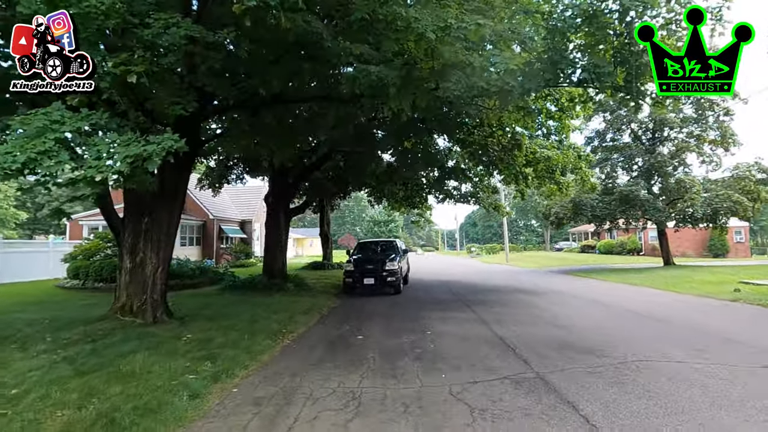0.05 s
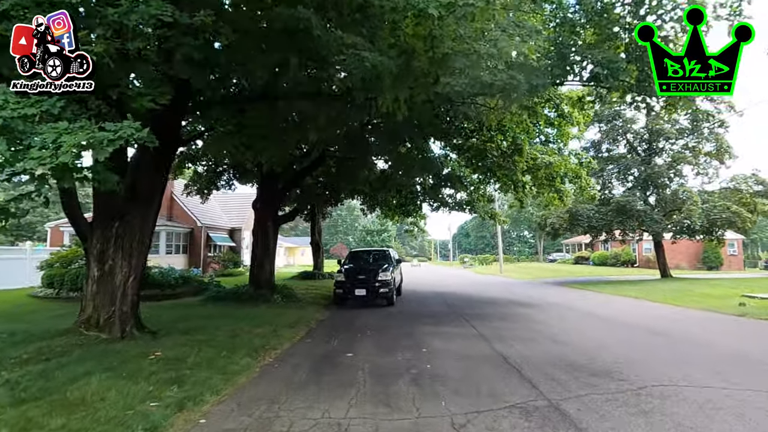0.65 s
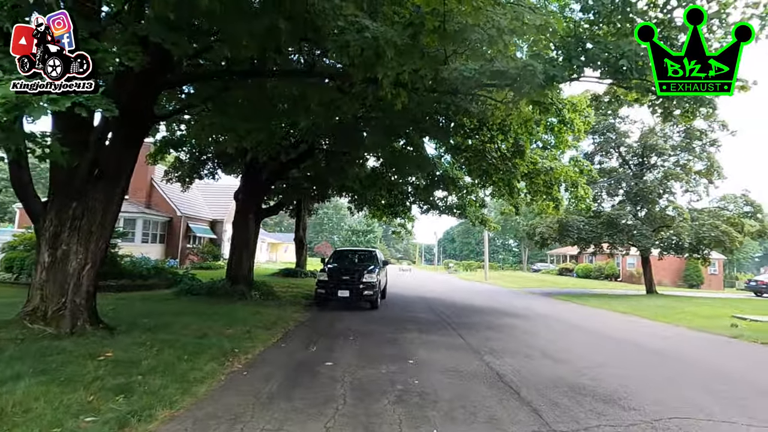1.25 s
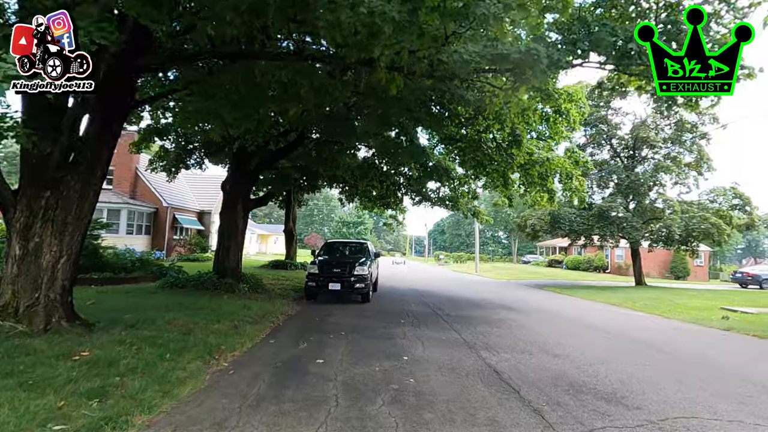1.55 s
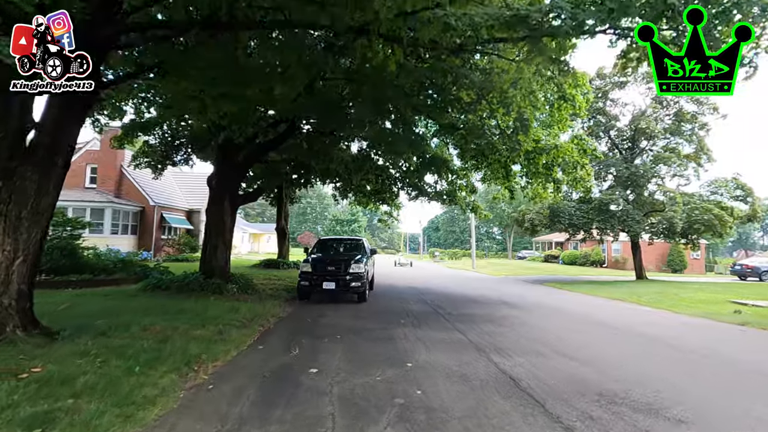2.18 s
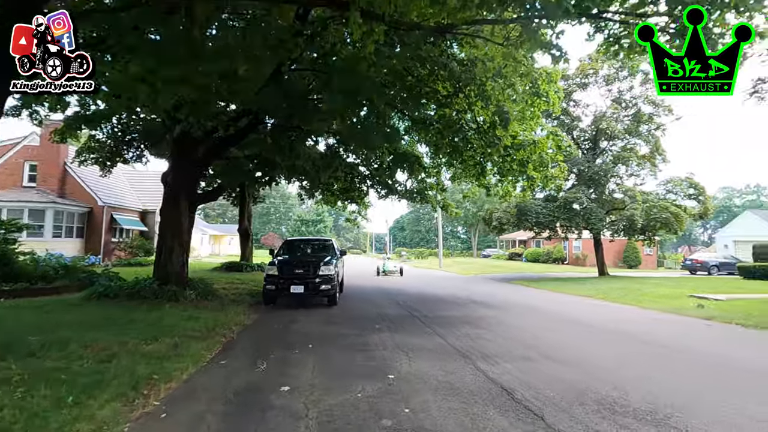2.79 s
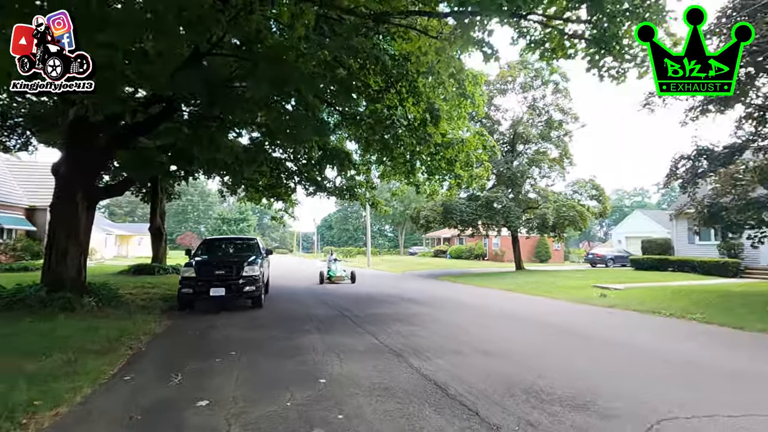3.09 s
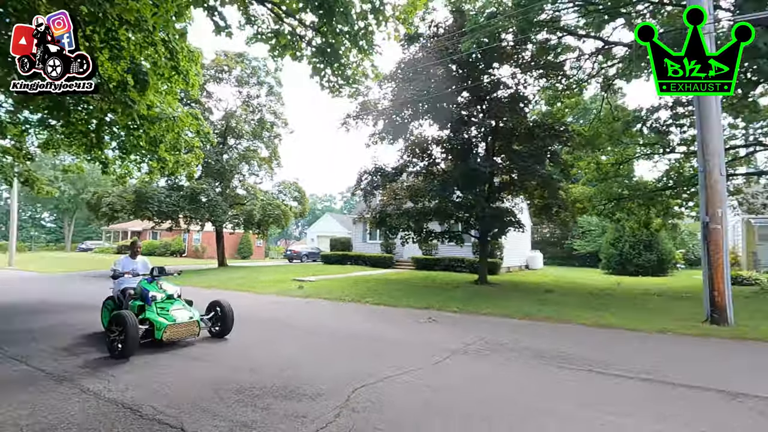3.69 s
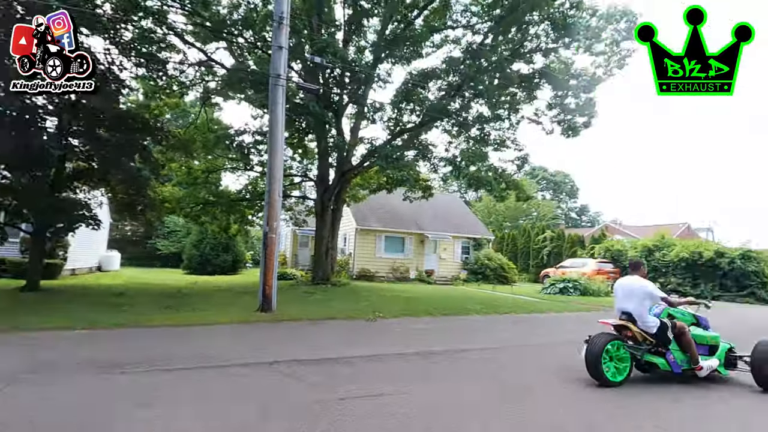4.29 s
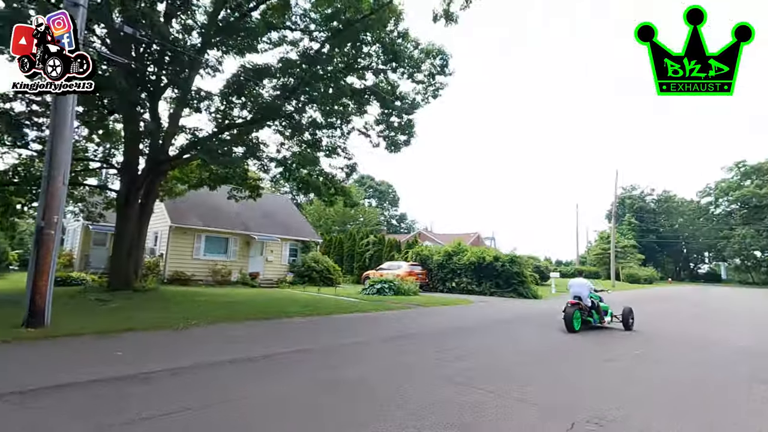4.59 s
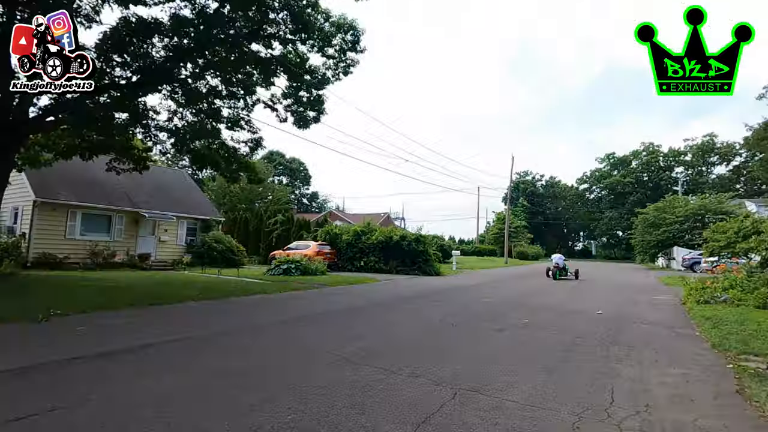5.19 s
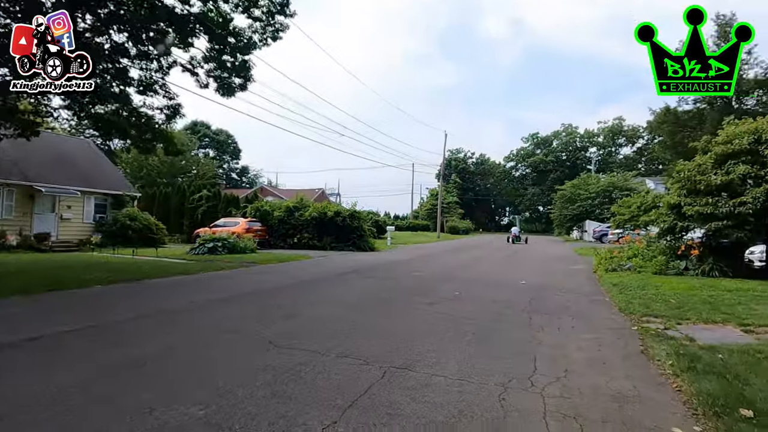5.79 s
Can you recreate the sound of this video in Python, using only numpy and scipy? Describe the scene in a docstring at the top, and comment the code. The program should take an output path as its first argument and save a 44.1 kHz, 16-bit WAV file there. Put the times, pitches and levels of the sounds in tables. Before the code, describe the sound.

Outdoors, wind buffets the microphone with low thumps while a motor trike's raspy exhaust drone grows from the distance, over faint leaves, insects and a few bird chips. The engine is loudest as it sweeps by about two thirds of the way through, its note falling. It then recedes down the street, easing off into an uneven burble with several dull pops.

```python
"""An open exhaust drones closer: a three-cylinder trike passes at about 4 s and shuts the throttle at 5 s.
The pipe sounds the firing harmonics, gas and tyres hiss, and on the overrun it burbles and spits.
Wind buffets the microphone and pushes a limiter.
In the trees along the street, leaves rustle, insects shrill and a small bird chips."""
import sys
import numpy as np
from scipy import signal
from scipy.fft import rfft, irfft, next_fast_len
from scipy.io import wavfile
from scipy.ndimage import uniform_filter1d, minimum_filter1d

SR = 44100
rng = np.random.default_rng(int(sys.argv[2]) if len(sys.argv) > 2 else 0)


def file_out(sig):
    """Save sig as 16-bit WAV at sys.argv[1]."""
    # one column per channel
    cols = np.atleast_2d(sig).T
    # limit, then scale
    lim = np.clip(cols, -1, 1)
    pcm = np.round(lim * 32767).astype(np.int16)
    wavfile.write(sys.argv[1], SR, pcm)


N = 257971
T = np.arange(N) / SR
PASS_S, SPEED_M_S, CLOSEST_M = 4.12, 18, 3.0
FAR_M, FRONT_M = 72, 33  # pipe timbre: far beyond FAR_M, frontal within FRONT_M
SHUT_S, OVERRUN_S = 5.0, 0.39  # throttle shuts; time to sink into overrun
THUD, BODY, DRONE, BARK, ROAR, HISS = range(6)  # rows of ENGINE_VOICES

# Engine speed: time_s, firing_hz
ENGINE_SPEED = [(0, 132.2), (.55, 125.8), (.92, 121.9), (1.5, 122), (1.7, 123.5), (3.4, 123.1),
                (4.4, 122.9), (4.97, 122.2), (5.12, 117.4), (5.3, 114.1), (5.45, 109), (5.85, 108)]
def crank():
    """Doppler-shifted count of four-stroke cycles; even under load, hunting on the overrun."""
    _, bearing = road()
    heard_hz = curve(ENGINE_SPEED) / (1 + bearing * SPEED_M_S / 343)
    hunting = np.interp(T - SHUT_S, [.15, .4], [.0012, .011])
    return np.cumsum(heard_hz * (1 + hunting * walk(90))) / SR / 3


# Silencer booms at the firing rate: centre_s, half_length_s, level_db
BOOMS = [(5.0, 0.029, -14), (5.28, 0.1, -16), (5.53, .1, -14.5)]
# Brief fades of one firing harmonic: harmonic, centre_s, half_length_s, change_db
FADES = [(2, 1.004, 0.056, -11.5), (2, 1.8, .1, -10), (1, 2.52, 0.48, -6)]
# Low pipe harmonics, relative levels: cycle_multiple, far_db, front_db, behind_db
LUMP_HARMONICS = [(4, -39, -36, -23), (5, -32, -36, -30), (7, -30, -33, -27), (8, -14, -18, -24.5),
                  (10, -15, -16, -19), (11, -31.5, -46.5, -43.5), (12, -14, -28.5, -25)]
# Upper pipe harmonics, relative levels: cycle_multiple, far_db, front_db, behind_db
BARK_HARMONICS = [(13, -5, -14, -22.5), (14, -8.5, -3.5, -16.5), (15, 6.5, 2.5, 3), (16, -5.5, 0, -8),
                  (17, 1.5, -1, -16), (18, 1, 2, 3), (19, -17, -27, -17.5), (20, -18.5, -20.5, -25),
                  (21, 6, -4.5, -24.5), (22, -3.5, -22.5, -24), (23, -7, -8.5, -21.5), (24, -6, -11, -4),
                  (25, -18, -10.5, -13), (27, -8, -21, -9), (30, -16, -17.5, -18)]
def drone(cycle, view, flutter_db=1.5, stumble_db=3.5, jitter_rad=.035, closing_s=0.027):
    """Three strong firing harmonics, the lump of unequal cylinders, and a bark on open throttle."""
    thud_db, body_db, drone_db, bark_db = map(level_db, (THUD, BODY, DRONE, BARK))
    # combustion grows uneven on the overrun
    uneven_db = flutter_db + (stumble_db - flutter_db) * shut(OVERRUN_S)
    gains = [np.hypot(undb(thud_db), humps(BOOMS)), undb(body_db), undb(drone_db)]
    firing = 0
    for k, gain in enumerate(gains, 1):
        fade_db = sum(db * hump(s, half_s) for harmonic, s, half_s, db in FADES if harmonic == k)
        angle = 6 * np.pi * k * cycle + jitter_rad * walk(30)
        firing -= np.sqrt(2) * gain * undb(fade_db + uneven_db * walk(26)) * np.cos(angle)
    lump = harmonics(cycle, view, LUMP_HARMONICS, scatter=0.22) * undb(drone_db - 2)
    # the open end beams its upper harmonics backwards
    beam_db = np.interp(view, [0, 1, 2], [-.5, -.7, 2.5])
    bark = unit(harmonics(cycle, view, BARK_HARMONICS, scatter=0.27))
    return firing + lump + bark * undb(bark_db + beam_db - 9 * shut(closing_s))


def harmonics(cycle, view, rows, scatter, direct_db=5, direct_m=19):
    """Pipe harmonics waver with reflections; close by, direct sound lifts the firing multiples."""
    distance, _ = road()
    closeness = 1 / (1 + (distance / direct_m) ** 2)
    wavering = scatter * (1 - closeness / 2)
    out = 0
    for k, *db in rows:
        on_firing = round(k) % 3 == 0
        angle = 2 * np.pi * (round(k) * cycle + rng.random()) + wavering * walk(16)
        gain = np.interp(view, [0, 1, 2], undb(db)) * undb(direct_db * closeness * on_firing)
        out += np.sqrt(2) * gain * (1 + wavering * walk(18)) * np.sin(angle)
    return out


# Gas roar spectrum: freq_hz, relative_db
ROAR_SPECTRUM = [(450, -1.5), (700, -1), (1050, -5), (1500, -7), (2000, -13.5), (3500, -25)]
# Gas and tyre hiss spectrum: freq_hz, relative_db
HISS_SPECTRUM = [(1180, -11.5), (2000, -5.5), (3090, -3.5), (4280, -9.5), (5730, -10.5), (6980, -16.5),
                 (8790, -15.5), (9660, -19.5), (10700, -30.5), (13700, -25), (15500, -34)]
def rush(cycle, pulsing=0.18, sharpness=0.74):
    """Gas leaves in a puff at each firing, one cylinder stronger; tyre noise fills the gaps."""
    roar_db, hiss_db, drone_db = map(level_db, (ROAR, HISS, DRONE))
    imbalance = 1 + 0.24 * np.cos(2 * np.pi * cycle)
    puffs = unit(np.exp(sharpness * np.cos(6 * np.pi * cycle)) * imbalance)
    gate = unit(1 - pulsing + pulsing * puffs * undb(3 * walk(130)))
    turbulence = walk(16)
    roar = noise(ROAR_SPECTRUM) * undb(roar_db + 1.5 * turbulence)
    hiss = noise(HISS_SPECTRUM) * undb(hiss_db + 0.83 * turbulence)
    pipe_flow = unit(ring(ring(rng.standard_normal(N), 366, 110), 300, 260))
    return gate * (roar + hiss + pipe_flow * undb(drone_db - 18 + 0.41 * turbulence))


# Header pipe resonances: centre_hz, nominal_width_hz, relative_db
HEADER_MODES = [(1034, 390, 4), (1390, 680, -7.5), (1964, 880, -6.5), (2555, 450, -11.5), (3370, 670, -8.5)]
def rasp(cycle, near_db=-9.5, far_db=-3.5, scatter_db=5.5, decay_s=.005):
    """The sharp edge of each blow-down rings the header pipes, differently for each cylinder."""
    at = firings(cycle)
    strength = undb(scatter_db * np.minimum(rng.standard_normal(len(at)), 1))
    edges = 0
    for cylinder in range(3):
        pulses = np.zeros(N)
        pulses[at[cylinder::3]] = strength[cylinder::3]
        clatter = rng.standard_normal(1024) * np.exp(-T[:1024] / decay_s)
        edges += signal.oaconvolve(pulses, unit(clatter))[:N]
    distance, _ = road()
    offset_db = np.interp(distance, [CLOSEST_M, FRONT_M], [near_db, far_db])
    return unit(resonate(edges, HEADER_MODES)) * undb(level_db(ROAR) + offset_db)


# Silencer resonances: centre_hz, nominal_width_hz, relative_db
SILENCER_MODES = [(131, 43, -2.5), (182, 85, -2.5), (332, 123, -6), (450, 218, -13)]
def burble(cycle, scatter_db=4.0, jitter_s=0.00099, puff_s=0.013, rise_s=0.098):
    """Overrun firings come weak, strong, early and late; each thumps the silencer and puffs gas."""
    at = firings(cycle)
    timing, strength = rng.standard_normal((len(at), 2)).T
    at = np.clip(at + (jitter_s * SR * timing).astype(int), 0, N - 1)
    pulses = np.zeros(N)
    pulses[at] = undb(scatter_db * np.minimum(strength, 1.5))
    pulses = lowpass(pulses, 700)
    puffs = signal.lfilter([1], [1, -np.exp(-1 / (puff_s * SR))], pulses)
    gas = puffs * noise([(550, -2.5), (1000, -0.5), (1700, -12.5), (2450, -10), (4500, -29)])
    thumps = unit(resonate(pulses, SILENCER_MODES))
    return (thumps + unit(gas) * undb(-13)) * undb(-17.5) * shut(rise_s)


# Afterfire: start_s, level_db
SPITS = [(4.983, -19), (5.355, -22), (5.393, -23), (5.429, -22.5), (5.486, -17), (5.621, -24)]
def spits(decay_s=.008):
    """Unburnt fuel goes off in the pipe in short, dull cracks."""
    bursts = sum(undb(db) * (T > s) * np.exp(-np.abs(T - s) / decay_s) for s, db in SPITS)
    return lowpass(bursts, 900) * noise([(300, -10), (1000, 9), (1700, -6), (5000, -21)])


# How each voice carries: base_db, reach_m, loss_per_doubling_db, behind_db, swell_share, overrun_db
ENGINE_VOICES = [(-20.5, 4.04, 4, -1.5, 0.36, 11.5), (-10.5, 6.93, 7, -6.5, 0.39, -4.5),
                 (-11, 16.8, 6.5, -0.5, 0.74, -11.5), (-23.5, 14.1, 6, -0.5, 0.49, 0.5),
                 (-25.5, 9.3, 5.5, -3, 0.096, -1), (-33.5, 14.55, 11.5, -5.5, 0.36, 4.5)]
# Exhaust swell and sag, before swell_share: time_s, change_db
SWELL = [(0, -3), (.1, -7.5), (.28, -12), (.6, -0.5), (1.15, -6), (1.45, 4.5), (1.85, -2.5), (2.25, -0.5),
         (2.4, -5), (3.02, 2.5), (3.35, -3), (3.5, 1.5), (3.97, -0.5), (4.09, 1.5), (4.35, -3),
         (4.94, -2.5), (5.0, 2), (5.06, -4.5)]
def level_db(voice, carry_behind=2.76):
    """Voice level from distance, bearing and throttle; the rear-facing pipe carries farther behind."""
    base_db, reach_m, loss_db, behind_db, share, overrun_db = ENGINE_VOICES[voice]
    distance, bearing = road()
    behind = (1 + bearing) / 2
    doublings = np.log2(np.hypot(1, distance / (reach_m * carry_behind ** behind)))
    source_db = base_db + share * curve(SWELL) + overrun_db * shut(OVERRUN_S) ** 2
    return source_db - loss_db * doublings + behind_db * behind


def road():
    """Straight pass at steady speed: distance in metres, bearing from -1 coming to 1 going."""
    along = SPEED_M_S * (T - PASS_S)
    distance = np.hypot(along, CLOSEST_M)
    return distance, along / distance


def firings(cycle):
    """Samples at which a cylinder fires, three to a cycle."""
    return np.flatnonzero(np.diff(np.floor(3 * cycle)))


def shut(ramp_s):
    """Ramp from 0 to 1 once the throttle shuts."""
    return np.clip((T - SHUT_S) / ramp_s, 0, 1)


# Swells and dips: centre_s, half_length_s, change_db
WAVERS = [(0.74, 0.025, -2.5), (2.405, 0.065, -3.5), (3.084, .13, 2.5), (3.7, 0.28, 3),
          (3.965, 0.053, -4.5), (4.074, 0.028, 0)]
def waver():
    """Gain that briefly lifts or dips the rush, rasp and leaves."""
    return undb(sum(db * hump(s, half_s) for s, half_s, db in WAVERS))


# Slow pressure swings: time_s, level_db
SWAY = [(0, -7.5), (1.2, -7), (2.4, -12.5), (3.3, -7.5), (4, -14.5), (4.8, -15.5), (5.2, -10), (5.85, -6)]
# Buffeting spectrum: freq_hz, relative_db
BUFFET_SPECTRUM = [(12, 3.5), (22, 2.5), (50, -7), (80, -17.5), (130, -27), (250, -42.5), (600, -65.5)]
# Gusts: centre_s, half_length_s, level_db
GUSTS = [(.11, 0.045, -9.5), (.66, 0.052, -15), (.96, .08, -14.5), (1.4, 0.097, -9), (1.78, 0.079, -12),
         (1.96, .04, -19), (2.23, 0.066, -15), (2.53, 0.079, -17), (3.08, .05, -21), (3.68, 0.13, -19),
         (5.04, 0.064, -14), (5.39, .04, -12.5)]
# Single eddies: centre_s, half_length_s, level_db
THUMPS = [(0.647, 0.048, -9.5), (1.01, .03, -17), (1.435, 0.047, -8), (1.76, .03, -22),
          (1.96, 0.017, -13.5), (2.27, 0.032, -23), (3.088, .012, -9)]
def wind(rise_db_per_s=0.07, wander_db=5, pop_s=.1295):
    """Eddies at the microphone: slow pressure swings, buffeting gusts, thumps and one sharp pop."""
    sway = unit(np.tanh(noise([(2.5, 7.5), (5, 5), (11, -5), (19, -11.5), (30, -20.5)])))
    lull_db = -13 * hump(4.07, 0.065)
    steady = undb(-22.5 + rise_db_per_s * T + wander_db * walk(13) + lull_db)
    buffet = noise(BUFFET_SPECTRUM) * np.hypot(steady, humps(GUSTS))
    thumps = humps(THUMPS) * noise([(30, 4), (48, 4.5), (75, -9.5), (130, -30.5), (300, -50)])
    pop_edge = (1 + np.tanh((T - pop_s) / .00009)) / 2
    pop = undb(-7) * pop_edge * np.exp(-np.abs(T - pop_s) / .0015)
    return sway * undb(curve(SWAY)) + buffet + thumps + pop


# Leaf spectrum: freq_hz, relative_db
LEAF_SPECTRUM = [(1500, 2), (1970, -1), (2350, -5), (2660, 0.5), (3000, -2.5), (3900, -3.5), (5100, -9.5),
                 (7000, -14.5), (8800, -17), (9700, -22.5), (10600, -31), (15000, -36)]
# Breaths of breeze: start_s, length_s, level_db
RUSTLES = [(0.512, 0.17, -46), (0.846, 0.57, -45.5), (1.263, 0.477, -40.5), (2.05, 0.21, -47)]
def leaves(floor_db=-45, rise_s=0.038, fall_s=.035):
    """The trees rustle as the breeze comes, holds and drops."""
    breeze = 0
    for start_s, length_s, db in RUSTLES:
        rise = np.clip((T - start_s) / rise_s, 0, 1)
        fall = np.exp(-np.maximum(T - start_s - length_s, 0) / fall_s)
        breeze += undb(db) * rise * fall
    return noise(LEAF_SPECTRUM) * np.hypot(undb(floor_db), breeze) * undb(0.52 * walk(14))


# Bird chips: start_s, length_s, top_pitch_hz, level_db
CHIPS = [(0.186, 0.051, 4900, -39), (0.275, 0.034, 3850, -40), (0.537, 0.036, 4070, -47),
         (.612, 0.034, 4450, -41.5), (0.978, 0.046, 4830, -41)]
def bird(arch=0.2, echo=0.42):
    """Short arched chips with a fast warble, blurred by the foliage."""
    chips = np.zeros(N)
    warble = 1 + .026 * walk(400)
    for start_s, length_s, top_hz, db in CHIPS:
        progress = np.clip((T - start_s) / length_s, 0, 1)
        pitch_hz = top_hz * (1 - arch * (2 * progress - 1.15) ** 2) * warble
        chips += undb(db) * np.sin(np.pi * progress) * np.sin(2 * np.pi * np.cumsum(pitch_hz) / SR)
    foliage = rng.standard_normal(SR // 4) * np.exp(-T[:SR // 4] / .025)
    return chips + echo * signal.oaconvolve(chips, foliage / np.linalg.norm(foliage))[:N]


def insects(pitch_hz=2642, width_hz=110, db=-54.5):
    """A thin, steady shrill from the trees."""
    band = ring(rng.standard_normal(N), pitch_hz, width_hz)
    return undb(db) * unit(ring(band, pitch_hz, width_hz))


def undb(db):
    """Decibels to gain."""
    return 10 ** (np.asarray(db) / 20)


def unit(x):
    """Scale to rms 1."""
    return x / np.sqrt(np.mean(x ** 2))


def curve(rows):
    """Straight lines through (time_s, value) rows."""
    return np.interp(T, *np.transpose(rows))


def hump(centre_s, half_s):
    """Smooth rise to 1 and fall."""
    return np.exp(-((T - centre_s) / half_s) ** 2)


def humps(rows):
    """Summed gain of (centre_s, half_length_s, level_db) rows."""
    return sum(undb(db) * hump(s, half_s) for s, half_s, db in rows)


def walk(rate_hz):
    """Smooth random drift of spread 1, with rate_hz new values a second."""
    points = signal.resample(rng.standard_normal(4096), 8 * 4096)
    return np.interp(8 * rate_hz * T, np.arange(len(points)), points)


def noise(spectrum):
    """Noise of rms 1 shaped by (freq_hz, relative_db) rows, falling off beyond their ends."""
    hz, db = np.transpose(spectrum)
    size = next_fast_len(N)
    f = np.maximum(np.arange(size // 2 + 1) * SR / size, .1)
    skirts = np.minimum(f / hz[0], 1) ** 2 * np.minimum(hz[-1] / f, 1) ** 2
    gain = undb(np.interp(np.log(f), np.log(hz), db)) * skirts
    return unit(irfft(rfft(rng.standard_normal(size)) * gain, size)[:N])


def ring(x, hz, width_hz):
    """One resonance, gain 1 at its centre."""
    return signal.lfilter(*signal.iirpeak(hz, hz / width_hz, fs=SR), x)


def resonate(x, modes, narrowing=0.86):
    """Resonances of alternating sign, each applied twice for deep valleys."""
    return sum((-1) ** k * undb(db) * ring(ring(x, hz, narrowing * width), hz, narrowing * width)
               for k, (hz, width, db) in enumerate(modes))


def lowpass(x, hz):
    """Round off sharp edges."""
    return signal.sosfilt(signal.butter(2, hz, fs=SR, output="sos"), x)


def scene():
    """The trike's pitch drops and its pipe comes into view as it passes; wind and trees surround it."""
    distance, bearing = road()
    cycle = crank()
    # view of the pipe: 0 far off, 1 in front, 2 behind
    view = np.interp(distance, [FRONT_M, FAR_M], [1, 0]) + (1 + bearing) / 2
    trike = drone(cycle, view) + (rush(cycle) + rasp(cycle)) * waver() + burble(cycle) + spits()
    return (trike + wind() + leaves() * waver() + insects() + bird())[None]


def record(dry, ceiling=.95, hold_s=0.008, cutoff_hz=15450):
    """A look-ahead limiter ducks everything under the biggest swings; the top treble is cut."""
    window = int(hold_s * SR)
    gain = np.minimum(1, ceiling / (np.abs(dry) + 1e-9))
    gain = uniform_filter1d(minimum_filter1d(gain, window), window)
    fade_in = np.minimum(T / .003, 1)
    treble_cut = signal.ellip(8, .2, 70, cutoff_hz, fs=SR, output="sos")
    return signal.sosfilt(treble_cut, dry * gain * fade_in)


dry = scene()
out = record(dry)
file_out(out)
```